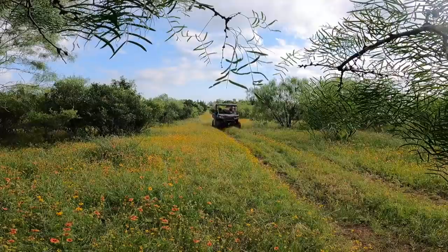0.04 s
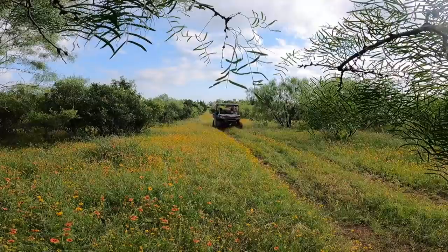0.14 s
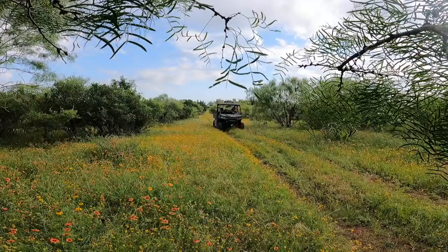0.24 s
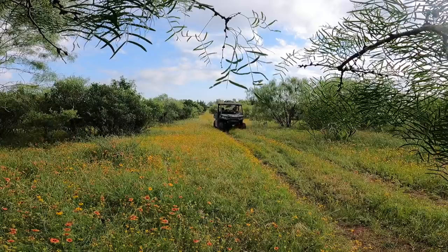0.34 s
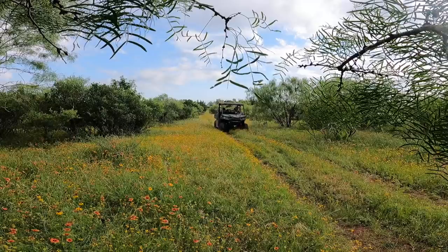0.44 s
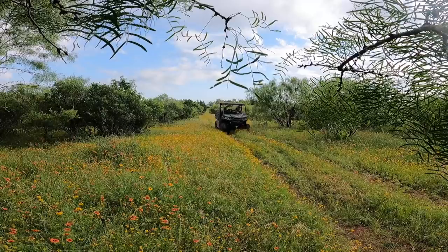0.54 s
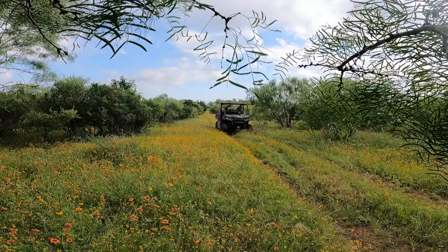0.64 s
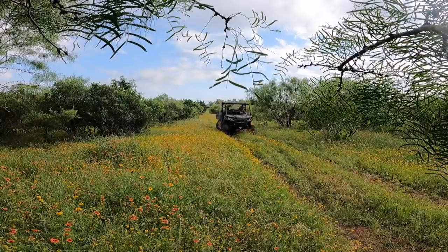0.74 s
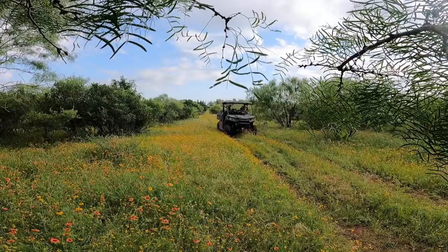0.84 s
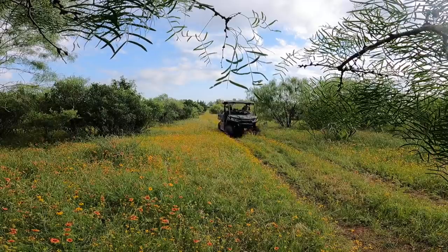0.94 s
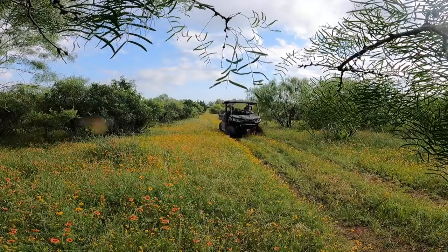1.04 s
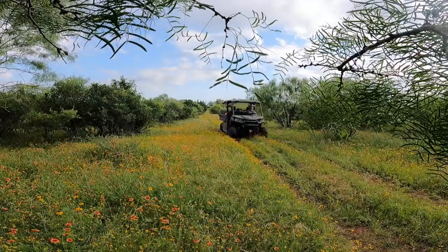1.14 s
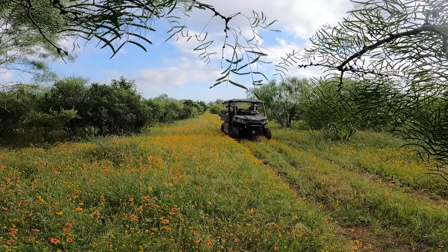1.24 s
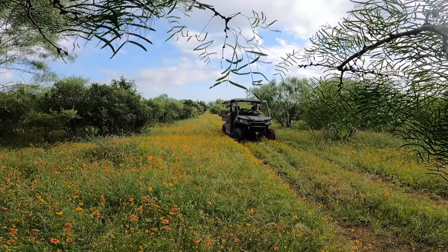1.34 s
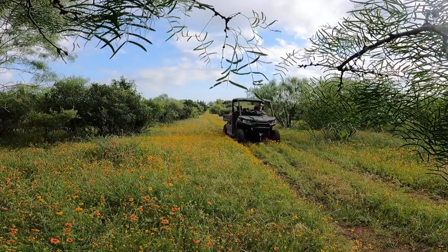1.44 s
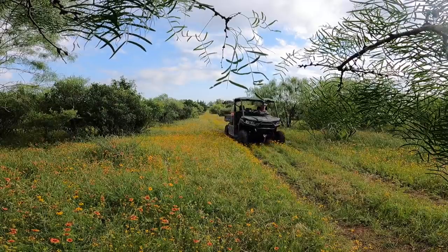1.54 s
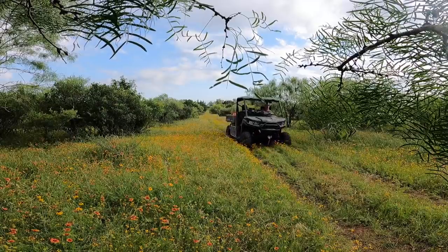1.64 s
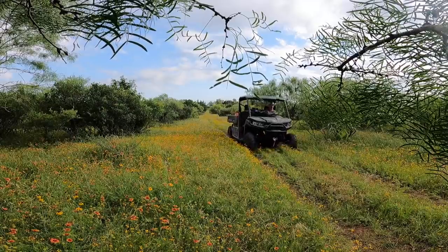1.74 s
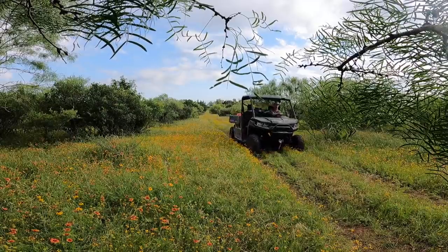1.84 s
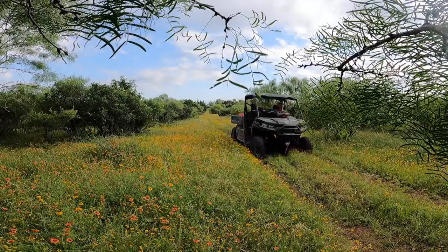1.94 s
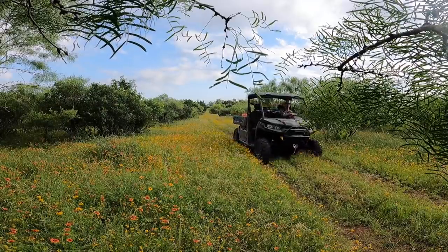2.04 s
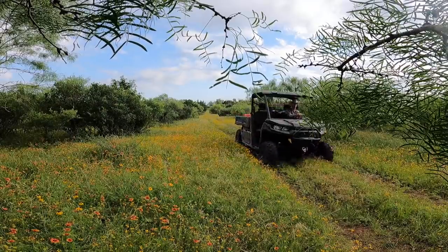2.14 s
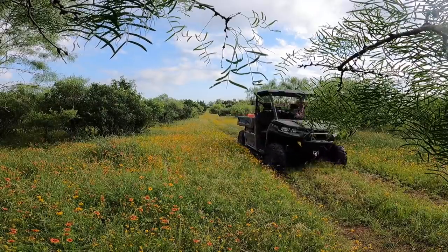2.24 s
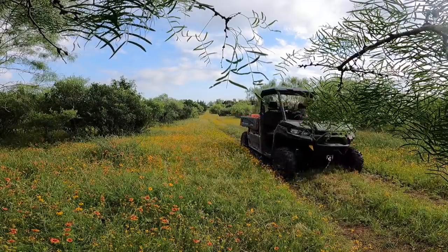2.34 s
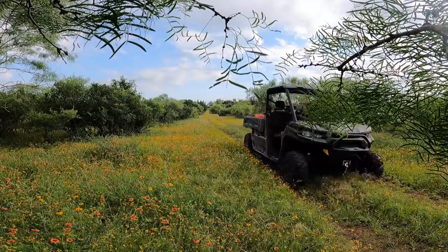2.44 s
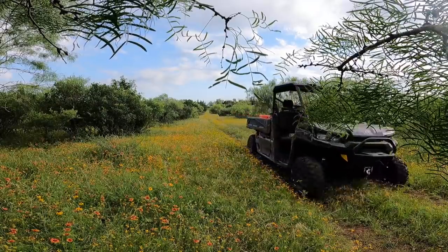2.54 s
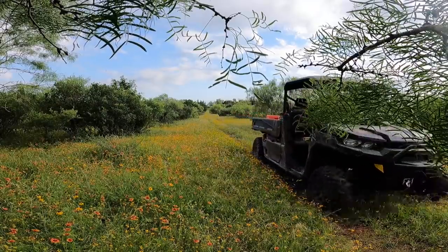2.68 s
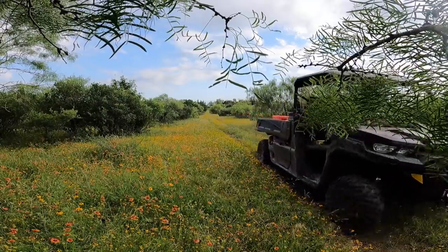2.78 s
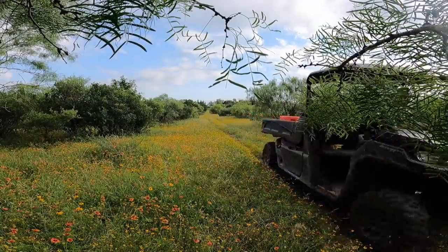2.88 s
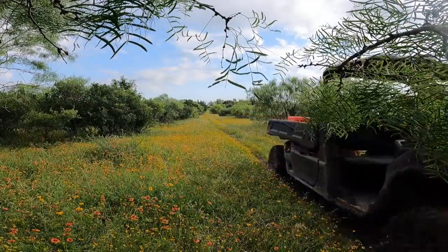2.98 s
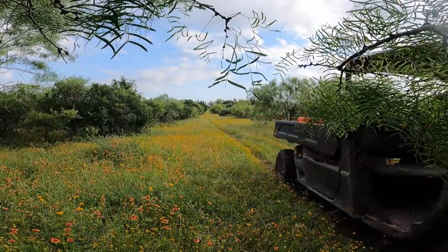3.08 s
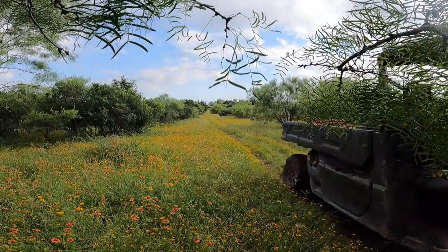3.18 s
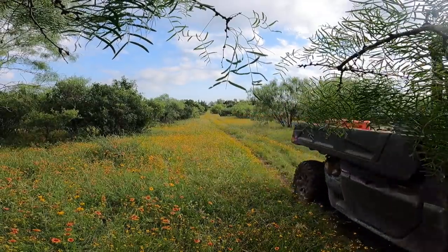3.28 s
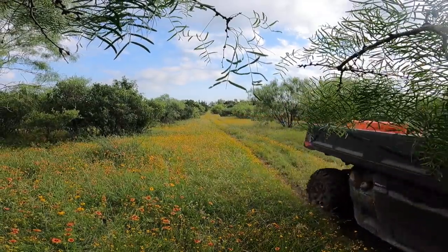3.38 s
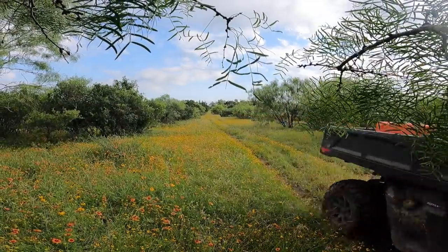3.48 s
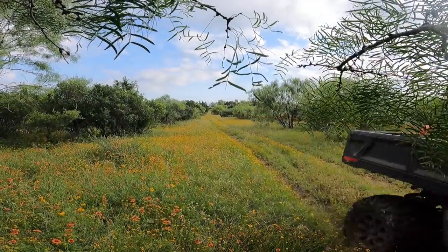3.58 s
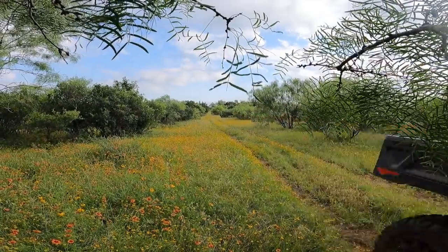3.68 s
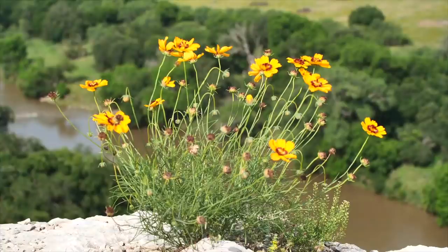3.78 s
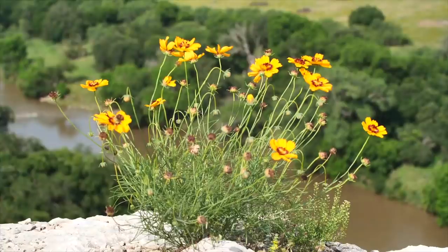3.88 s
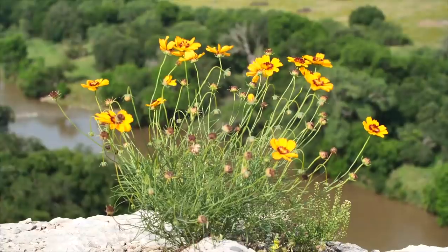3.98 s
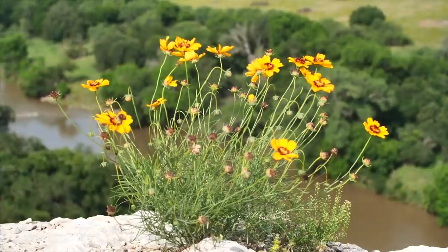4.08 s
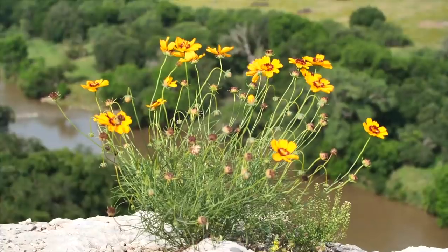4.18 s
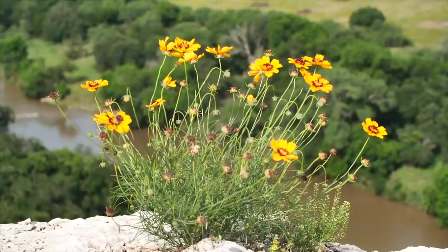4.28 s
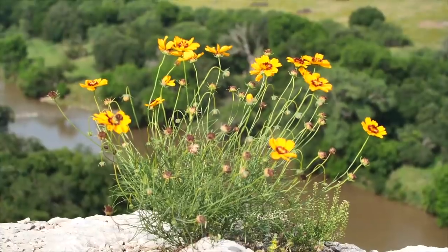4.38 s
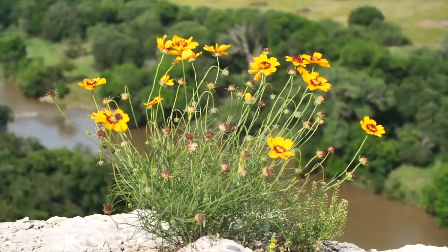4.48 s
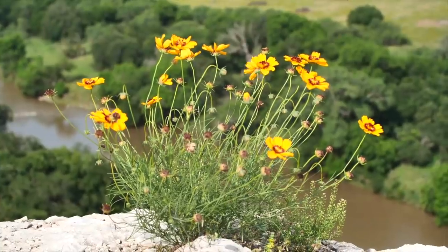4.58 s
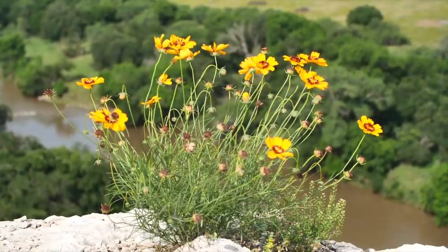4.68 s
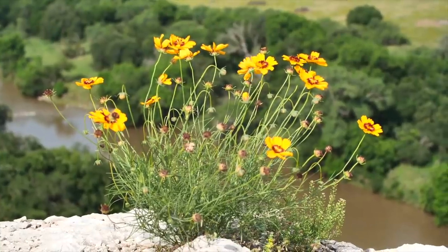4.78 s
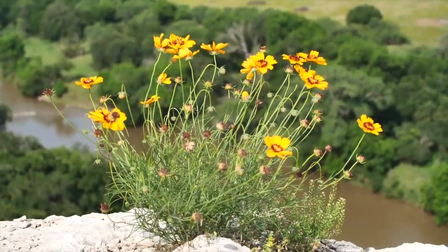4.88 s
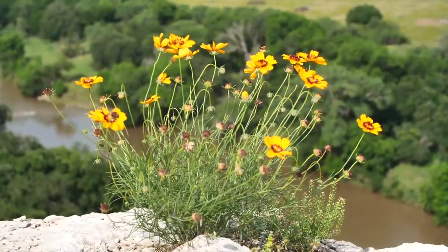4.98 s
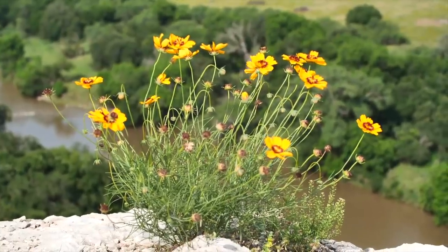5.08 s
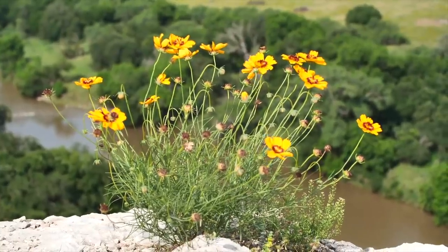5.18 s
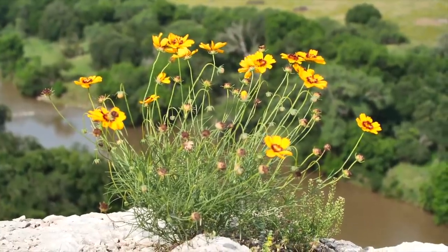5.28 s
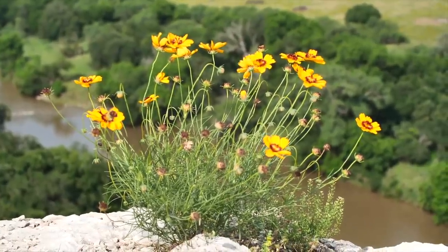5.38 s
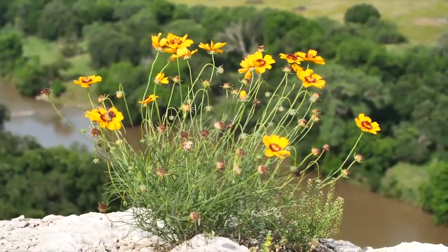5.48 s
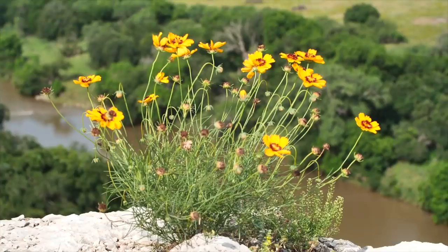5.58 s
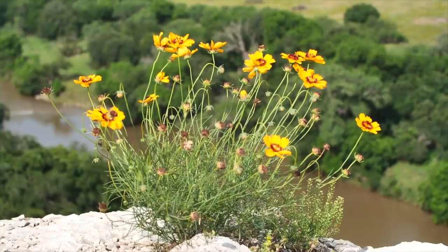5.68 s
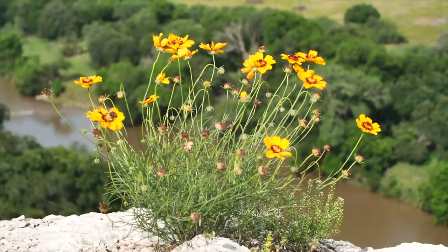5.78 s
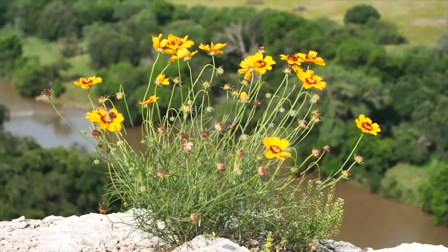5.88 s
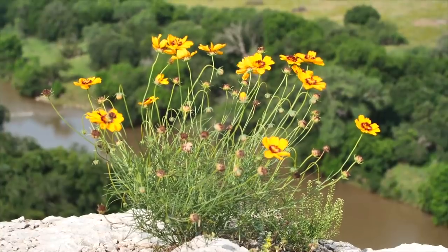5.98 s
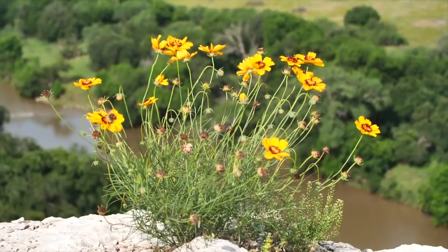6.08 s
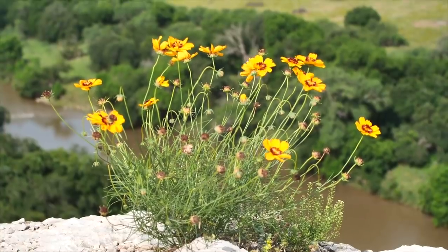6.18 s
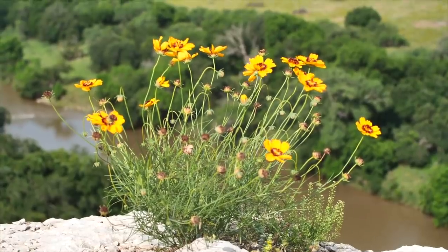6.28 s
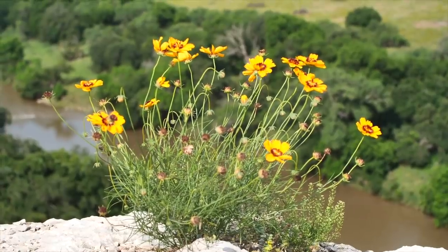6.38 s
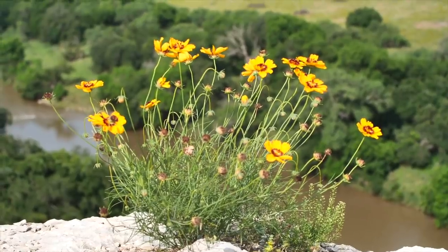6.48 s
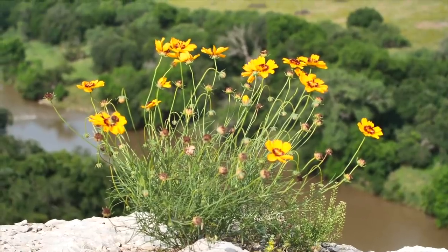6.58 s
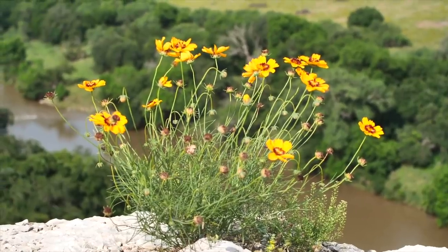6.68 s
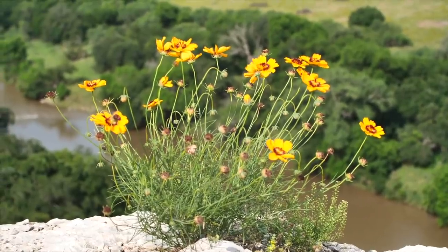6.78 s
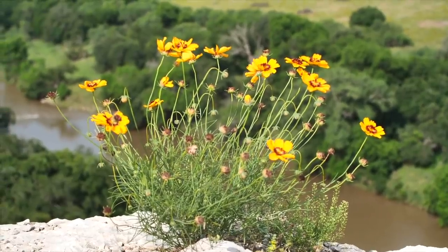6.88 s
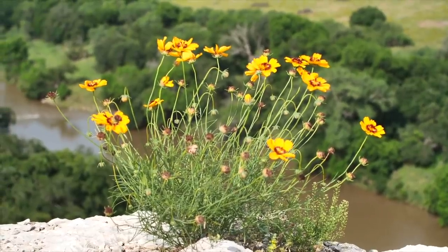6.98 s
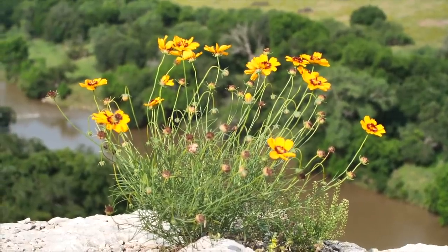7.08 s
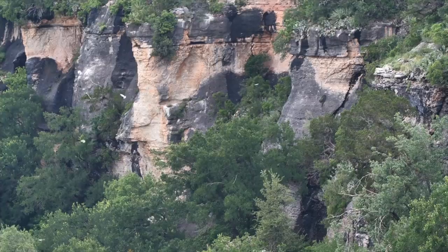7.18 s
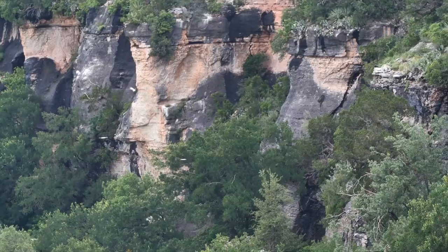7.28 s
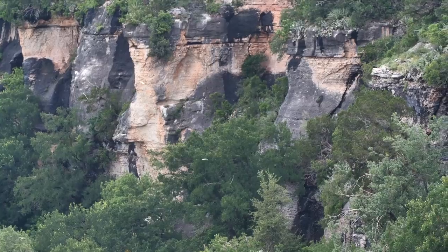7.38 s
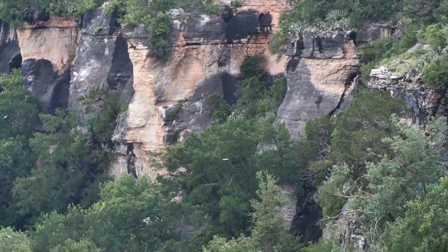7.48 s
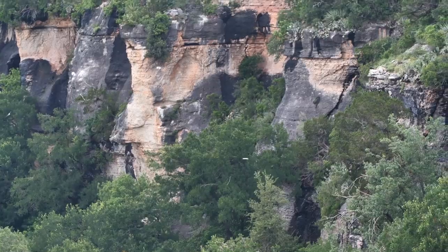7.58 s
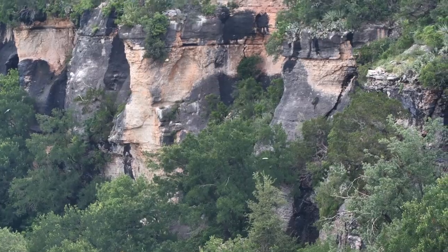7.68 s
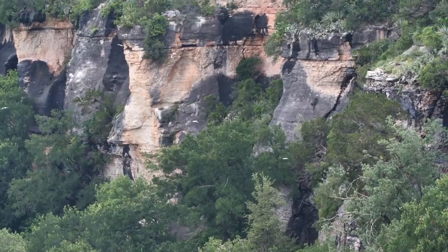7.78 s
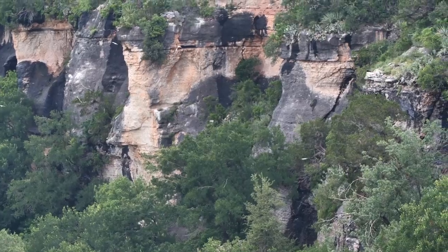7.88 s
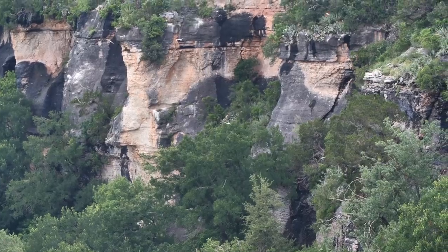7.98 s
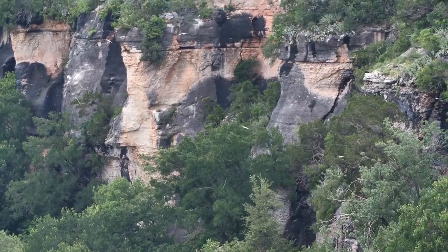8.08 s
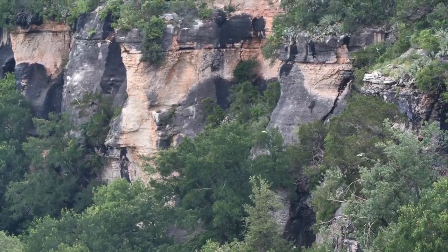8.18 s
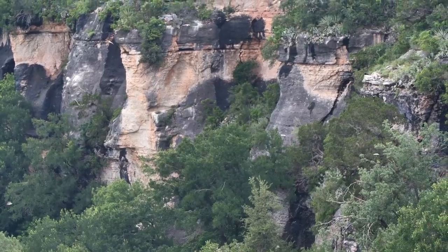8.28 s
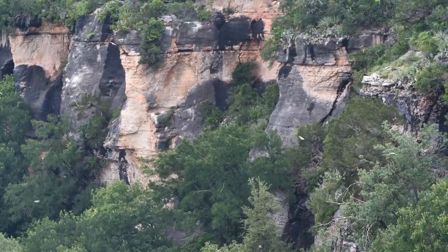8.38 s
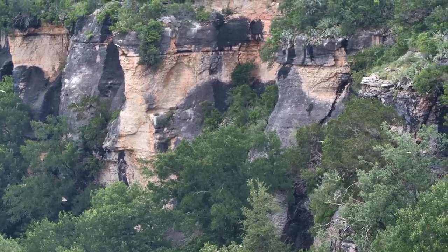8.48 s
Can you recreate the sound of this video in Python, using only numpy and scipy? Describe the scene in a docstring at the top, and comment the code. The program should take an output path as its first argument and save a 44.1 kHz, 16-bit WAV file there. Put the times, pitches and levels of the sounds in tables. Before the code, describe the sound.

A small twin-cylinder utility vehicle drones up a grassy track, passes close, drops to a putter and vanishes, leaving whistling songbirds and soft breeze.

```python
"""On a grassy track in open country, a twin-cylinder utility vehicle drives up, passes close by and fades at idle.
Engine cycles drive its exhaust tones, its tailpipe rings with uneven firings, and shaped noise gives
clatter, tyres and grass. One songbird whistles near by in gliding notes; others warble and twitter
farther off, scattered by leaves and echoed by trees and cliffs. As the vehicle leaves, a breeze of
coloured noise and a faint far hum of three tones rise."""
import sys
import numpy as np
from scipy import signal
from scipy.fft import rfft, irfft, next_fast_len
from scipy.io import wavfile
from scipy.ndimage import map_coordinates

SR = 44100
rng = np.random.default_rng(int(sys.argv[2]) if len(sys.argv) > 2 else 0)


def wrap_up_sound(samples):
    """Save the sound to the file named by the first command line argument, as 16-bit audio."""
    columns = np.atleast_2d(samples).T
    # keep every value between -1 and 1, then stretch to whole-number steps
    tamed = np.clip(columns, -1, 1)
    steps = np.round(tamed * 32767).astype(np.int16)
    wavfile.write(sys.argv[1], SR, steps)


N = 376173  # length in samples


def amp(db):
    """Decibels to gain."""
    return 10 ** (np.asarray(db) / 20)


def unit(x):
    """Scaled to rms 1."""
    return x / np.sqrt(np.mean(x ** 2) + 1e-20)


def along(points, hz):
    """Read (Hz, value) points on a log frequency axis."""
    f, v = np.transpose(points)
    return np.interp(np.log(hz + 1), np.log(f + 1), v)


def curves(rows):
    """One value per sample for each column after the time."""
    s, *cols = np.transpose(rows)
    return [np.interp(np.arange(N) / SR, s, c) for c in cols]


def wobble(rate):
    """A smooth random curve with rate knots a second."""
    knots = rng.standard_normal(int(N * rate / SR) + 4)
    return map_coordinates(knots, [np.arange(N) * rate / SR])


def filtered(x, response):
    """x times a response of frequency."""
    m = next_fast_len(N + SR // 2)
    return irfft(rfft(x, m) * response(np.fft.rfftfreq(m, 1 / SR)), m)[..., :N]


def ring(x, colour, size=16384):
    """Ring x through a causal, minimum-phase body with the given colour."""
    cepstrum = irfft(np.log(amp(along(colour, np.fft.rfftfreq(size, 1 / SR)))))
    # fold the cepstrum forward, so the body only answers after it is struck
    cepstrum[1:size // 2] *= 2
    cepstrum[size // 2:] = 0
    return signal.fftconvolve(x, irfft(np.exp(rfft(cepstrum))))[:N]


def add(track, s, sound):
    """Mix a sound into a track at time s."""
    part = track[max(round(s * SR), 0):][:len(sound)]
    part += sound[:len(part)]


def swells(rows):
    """Gain of a row of bell-shaped swells, each (s, half length s, dB)."""
    t = np.arange(N) / SR
    return sum(amp(db) * np.exp(-((t - s) / half) ** 2) for s, half, db in rows)


# Stereo spread of noise. Each row: frequency in Hz, side against mid in dB before each layer's offset.
WIDTH = [(150, -30.5), (380, -22), (700, -14), (1300, -7), (4400, -17), (15000, -20)]


def rush(spectrum, side_db):
    """Coloured stereo noise of rms 1, its width varying with frequency."""
    mid, side = filtered(rng.standard_normal((2, N)), lambda hz: amp(along(spectrum, hz)))
    side = filtered(side, lambda hz: amp(along(WIDTH, hz) + side_db))
    return unit(np.array([mid + side, mid - side]))


# Engine speed, a cruise dropping to idle. Each row: time in seconds, engine cycles a second.
ENGINE_SPEED = [(0, 25.88), (1.5, 26.02), (2.7, 26.14), (3.0, 26.0), (3.4, 25.55), (3.9, 24.75),
                (4.1, 24.5), (4.3, 22.7), (4.52, 21.35), (5.3, 20.3)]
# Clatter of the machinery. Each row: frequency in Hz, relative level in dB.
MACHINERY = [(290, -8.5), (500, -1.5), (661, -1), (843, -5.5), (969, -1), (1250, -5), (1370, -3.5),
             (1830, -10), (2130, -12), (2310, -11.5), (3430, -19), (4230, -17.5), (5090, -21),
             (7210, -27.5), (8000, -38), (10400, -40.5), (17600, -120)]
# Rumble of tyres and chassis. Each row: frequency in Hz, relative level in dB.
ROLL = [(25, -20), (60, 4), (110, 6.5), (200, -1.5), (350, -10), (600, -18), (1000, -56.5)]
# Brushed grass and dry stalks. Each row: frequency in Hz, relative level in dB.
GRASS = [(1500, -4), (3500, 4.5), (6000, -1.5), (8000, -4), (10000, -12.5), (12200, -14.5), (14000, -38),
         (15500, -51)]
CUT_S, CUT_DB_PER_S = 5.33, 402  # the last of the vehicle dies quickly


def vehicle():
    """Exhaust, clatter in step with the engine, a drive whine and tyres rolling through grass."""
    turns = .56 + np.cumsum(curves(ENGINE_SPEED)[0]) / SR
    exhaust = boom(turns) + bark(turns + 0.2398)  # the bark leads the boom, in cycles

    beat_db = 20 * np.log10(amp(.5 * np.cos(2 * np.pi * turns) + 0.29 * np.cos(4 * np.pi * turns)))
    clatter_db = beat_db + 0.81 * wobble(120) + 0.78 * wobble(12)
    clatter = passing("clatter") * unit(amp(clatter_db) * rush(MACHINERY, side_db=-17.0))

    # the rumble heaves with each firing and drops in the long gap
    chug_db = 2.5 * (np.cos(2 * np.pi * (turns - .21)) + np.cos(4 * np.pi * turns))
    rumble = passing("rumble") * unit(amp(chug_db + wobble(10)) * rush(ROLL, side_db=6.5))
    swish = passing("swish") * unit(amp(2.1 * wobble(500) + wobble(10)) * rush(GRASS, side_db=5.5))
    cut = amp(-CUT_DB_PER_S * np.maximum(np.arange(N) / SR - CUT_S, 0))
    return cut * (exhaust + clatter + whine(turns) + rumble + swish)


# How each part passes. Each entry: level abreast in dB before any fade, steepness of the distance law,
# start of its fade in seconds, fade in dB a second.
PARTS = { "boom": (-21.5, 0.73, 4.5, 31), "drone": (-25.2, 1.05, 2.65, 18), "clatter": (-36, 1.03, 4, 13.5),
         "whine": (-50, 2.2, 3.9, 18), "rumble": (-30.5, .5, 4.5, 18.5), "swish": (-47.5, 1.03, 4, 38)}
ABREAST_S, PASS_S = 3.526, 0.96  # the nearest moment; time to drive one passing distance


def passing(part):
    """Gain of one part of the vehicle: it swells with nearness and has its own later fade."""
    db, steepness, fade_s, fade_db_per_s = PARTS[part]
    t = np.arange(N) / SR
    distance = np.hypot(1, (t - ABREAST_S) / PASS_S)
    return amp(db - fade_db_per_s * np.maximum(t - fade_s, 0)) / distance ** steepness


# The exhaust's boom. Each row: engine order, relative level in dB from the front, from the side, from behind.
BOOM = [(1, -13, -6.5, -9.5), (2, 1.5, -2.5, 0.5), (3, 0.5, 2, -3.5), (4, -11, 1.5, -5)]
SIDE_S, TURN_S = 3.195, 0.82  # the side faces the listener; time from front to side, or side to rear


def boom(turns):
    """Low exhaust orders change with the side that faces us and stumble as the engine drops to idle."""
    unsteady, = curves([(0, .06), (4.1, .06), (4.4, .5), (5.3, .3)])  # radians
    out = np.zeros(N)
    for k, front_db, side_db, rear_db in BOOM:
        db, = curves([(SIDE_S - TURN_S, front_db), (SIDE_S, side_db), (SIDE_S + TURN_S, rear_db)])
        k = round(k)
        if k == 2:
            db = db + throb_db()
        # the second cylinder fires early in the cycle
        lag = np.angle(1 + .8 * np.exp(-2j * np.pi * k * .42))
        phase = 2 * np.pi * k * turns + lag + unsteady * wobble(22)
        out += np.sqrt(2) * amp(db + 1.1 * wobble(12)) * np.cos(phase)
    return passing("boom") * out


THROB_DB, THROB_HZ, THROB_SAG_HZ_PER_S = 4.5, 3.37, 0.72  # depth, rate at the first swell, slowing
THROB_PEAK_S, THROB_END_S = 0.15, 2.24  # its first swell, its end


def throb_db():
    """On the approach the firing tone beats, ever slower, and the beat dies as the vehicle comes near."""
    t = np.arange(N) / SR
    since = t - THROB_PEAK_S
    beats = THROB_HZ * since - .5 * THROB_SAG_HZ_PER_S * since ** 2
    return THROB_DB * np.clip(2 * (THROB_END_S - t), 0, 1) * np.cos(2 * np.pi * beats)


# The engine's drone from the front. Each row: frequency in Hz, relative level in dB.
DRONE = [(100, -25), (130, 9), (156, 0), (182, 2), (208, -5), (234, -2), (260, -11), (286, 2), (312, -8),
         (338, -12), (364, -5), (390, -2), (416, -12), (442, -24), (468, -2), (494, .5), (520, -14),
         (572, -9), (620, -14), (900, -35), (2000, -80)]
# The tailpipe's colour under load. Each row: frequency in Hz, relative level in dB.
LOAD_PIPE = [(85, -64.5), (108, -17), (124, 12), (150, 1.5), (178, -26), (205, 4), (240, 0), (276, 9),
             (310, 2), (345, -4.5), (415, -4.5), (480, -24.5), (600, -44), (900, -47), (2000, -79)]
# The tailpipe's colour at idle. Each row: frequency in Hz, relative level in dB.
IDLE_PIPE = [(70, -47.5), (90, -1), (103, 4), (122, -6.5), (160, -17), (210, -19), (245, -3.5), (285, -45),
             (400, -34), (470, -28), (900, -42), (2000, -82)]
# The tailpipe turns into view under load. Each row: time in seconds, level in dB.
LOAD_BARK = [(3.0, -57), (3.5, -36), (3.8, -25.5), (4.1, -26.5), (4.5, -41.5), (5, -67)]
# It putters at idle. Each row: time in seconds, level in dB.
IDLE_BARK = [(4.1, -58), (4.45, -36), (4.78, -30.5), (5.1, -37), (5.3, -46)]


def bark(turns, second_at=0.4243, second_db=-9, scatter_db=1.6):
    """Two uneven firings a cycle ring the tailpipe; from the front the engine drones and chugs."""
    firings = np.zeros(N)
    for offset, db in [(0, 0), (second_at, second_db)]:
        at = np.flatnonzero(np.diff(np.floor(turns - offset)))
        firings[at] += amp(db + scatter_db * rng.standard_normal(len(at)))

    waver, chug_db, cruise_hz = .16, -10, 26  # radians, dB against the tones, engine cycles a second
    steady = np.zeros(N)
    for k in range(5, 25):
        level = amp(along(DRONE, k * cruise_hz) + 1.5 * wobble(5))
        steady += level * np.cos(2 * np.pi * (k * turns + rng.random()) + waver * wobble(12))
    chug = amp(chug_db) * unit(ring(firings, DRONE))
    drone = passing("drone") * unit(unit(steady) + chug)
    loaded = amp(curves(LOAD_BARK)[0]) * unit(ring(firings, LOAD_PIPE))
    idling = amp(curves(IDLE_BARK)[0]) * unit(ring(firings, IDLE_PIPE))
    return drone + loaded + idling


# The drive's whine and its sidebands. Each row: engine order, relative level in dB.
WHINE = [(79, -5), (81, -5), (82, -6), (83, -1), (84, 0), (86, -8)]


def whine(turns):
    """The drive sings in a grainy band that comes and goes: close orders, each fluttering by itself."""
    flicker_db, waver, patchy_db = 3, 1.4, 3.6  # waver in radians
    tones = np.zeros(N)
    for k, db in WHINE:
        tones += amp(db + flicker_db * wobble(14)) * np.sin(2 * np.pi * k * turns + waver * wobble(40))
    return passing("whine") * unit(amp(patchy_db * np.tanh(2 * wobble(9))) * tones)


# The cargo bed rattles. Each row: start in seconds, relative level in dB.
RATTLES = [(1.284, -20.5), (1.436, -33), (1.715, -38), (1.788, -34), (1.864, -34), (1.895, -37),
           (3.619, -31), (4.231, -33)]
# Ringing modes of the steel bed. Each row: frequency in Hz, relative level in dB, t60 in seconds.
BED = [(2305, -1.5, 0.048), (2600, -1, 0.043), (3290, -10, 0.021), (3600, -4, 0.017)]
# The crack of each rattle. Each row: frequency in Hz, relative level in dB.
CLANK = [(900, -35), (1900, 2), (2600, -4), (3700, -3), (4300, -15.5), (7000, -39), (12000, -63)]
# Dry stalks break. Each row: start in seconds, relative level in dB.
SNAPS = [(0.387, -51), (0.6978, -46), (1.1573, -43), (1.705, -36), (2.8094, -39), (3.62, -35), (4.102, -41)]


def knocks(crack_t60=0.011):
    """Bumps ring the steel bed's modes with a noisy crack, and stalks snap under the wheels."""
    bed, clanks, stalks = np.zeros(N), np.zeros(N), np.zeros(N)
    t = np.arange(SR // 8) / SR
    clank_t60 = .028  # seconds
    for s, db in RATTLES:
        steel = np.zeros(len(t))
        for hz, level, t60 in BED:
            fading = amp(level + rng.normal(0, 2.1) - 60 * t / t60)
            steel += fading * np.sin(2 * np.pi * (hz * t + rng.random()))
        add(bed, s, amp(db - 4) * steel * (1 - np.exp(-t / 0.00038)))
        add(clanks, s, amp(db - 60 * t / clank_t60) * rng.standard_normal(len(t)))
    for s, db in SNAPS:
        add(stalks, s, amp(db + 6.5 - 60 * t / crack_t60) * rng.standard_normal(len(t)))
    return bed + ring(clanks, CLANK) + ring(stalks, GRASS)


# The tyres dig in. Each row: middle in seconds, half length in seconds, level in dB.
CRUNCHES = [(2.75, 0.12, -48), (3.27, .17, -41.5), (3.7, .14, -50)]
# Colour of crunching soil. Each row: frequency in Hz, relative level in dB.
GRIT = [(100, -50), (400, -34), (750, -1), (1020, 7), (1350, 2), (1700, -13), (2500, -17), (4500, -33),
        (12000, -55)]


def crunch():
    """Grains of soil give way in clumps under the passing tyres."""
    grains_per_s, clump_db = 700, 3
    grains = (rng.random(N) < grains_per_s / SR) * rng.standard_normal(N)
    grains = grains * amp(clump_db * wobble(30.17))
    return swells(CRUNCHES) * unit(ring(grains, GRIT))


# How far the vehicle's sound leans to the left, a little right at first and strongly left as it passes. Each
# row: time in seconds, lean (1 = the full shading below, negative leans right).
LEAN = [(0, -0.16), (2.5, -0.027), (3.2, 0.081), (3.6, 0.3), (3.95, 0.84), (4.4, 1.45), (5.2, 1.5)]
# Stereo shading at lean 1. Each row: frequency in Hz, left over right in dB.
LEAN_SHADE = [(150, 0.6), (280, 2.5), (470, 5), (1000, 13), (2300, 14), (4200, 8.5), (12000, 10)]


def travel(x):
    """The vehicle's sound leans ever more to the left as it passes, by an amount that depends on frequency."""
    hz, s, z = signal.stft(x, SR, nperseg=1024)
    ratio = amp(along(LEAN_SHADE, hz)[:, None] * np.interp(s, *np.transpose(LEAN)))
    left_right = 2 * np.array([ratio, np.ones_like(ratio)]) / (1 + ratio)
    return signal.istft(z * left_right, SR, nperseg=1024)[1][:, :N]


# The near bird's opening whistles and closing flourish. Each row: start in seconds, length in seconds,
# level in dB, middle pitch in Hz, shape.
SONG = [ (4.392, 0.038, -48, 4830, "rise"), (4.42, 0.021, -41.5, 4940, "scoop"),
        (4.44, 0.058, -59, 6100, "lead"), (4.5, 0.062, -36, 5274, "hold"),
        (4.612, 0.075, -48, 6300, "hump"), (4.678, 0.073, -32, 5344, "hold"),
        (5.48, 0.057, -40.5, 6550, "scoop"), (5.609, 0.067, -28.5, 4220, "scoop"),
        (5.748, 0.015, -40, 5700, "rise"), (5.76, 0.06, -42.5, 6920, "hump"),
        (5.808, 0.041, -28, 4350, "plunge"), (5.83, 0.045, -39.5, 3450, "fall"),
        (5.903, 0.07, -34.5, 4130, "crest")]
# Its phrase. Each row: seconds after the plunge, length in seconds, dB over the phrase, middle pitch in Hz, shape.
PHRASE = [(-.07, .2, -29.5, 7200, "hold"), (-.03, .048, -9.5, 5680, "lead"), (0, .045, 1, 4484, "plunge"),
          (0.034, .035, -18, 3120, "dip"), (0.066, .043, 1, 4567, "scoop")]
# Repeats of the phrase. Each row: time of the plunge in seconds, level in dB.
REPEATS = [(4.853, -30.5), (5.077, -29.5), (5.306, -29)]


def songbird():
    """The near bird opens with whistles, repeats its phrase and ends in a flourish."""
    phrases = []
    for s, db in REPEATS:
        for after, length, over_db, hz, shape in PHRASE:
            phrases.append((s + after, length, db + over_db, hz, shape))
    return sing(SONG + phrases)


# Note shapes by name. Each entry: pitch over the middle pitch, as a ratio, at five even steps.
SHAPES = { "hold": (1.0, 1.01, 1, 1.0, .97), "lead": (.92, .965, 1, 1.01, 1.0),
          "plunge": (1.33, 1.23, 1, .85, 0.75), "scoop": (0.82, .93, 1.005, 1.03, 1.01),
          "rise": (.81, .89, 1, 1.1, 1.18), "fall": (1.14, 1.07, 1, .93, 0.9),
          "dip": (1.3, 1.05, 1, 1.04, 1.066), "slide": (1.24, 1.1, 1, .97, .96),
          "climb": (.89, .94, 1, 1.06, 1.14), "droop": (1.1, 1.05, 1, .91, 0.82),
          "crest": (0.96, .89, 1, 1.14, 1.1), "hump": (.9, 0.97, 0.99, 0.94, 0.85),
          "vee": (1.27, 1.09, 1, 1.05, 1.25), "lift": (.91, .9, 1, 1.14, 1.27),
          "swoop": (1.42, 1.1, 1, 1.08, 1.07)}


def sing(notes):
    """A row of notes, each a shape sung at its own pitch."""
    out = np.zeros(N)
    for s, length, db, hz, shape in notes:
        add(out, s, amp(db) * whistle(length, hz * np.array(SHAPES[shape])))
    return out


def whistle(length, pitches):
    """One gliding note of a syrinx, swelling and fading, with a fine flutter and weak overtones."""
    flutter, shimmer_db, second_db, third_db = .006, .8, -39, -36  # flutter as a share of pitch
    u = np.linspace(0, 1, max(int(length * SR), 64))

    def quiver():
        return map_coordinates(rng.standard_normal(128), [u * length * 300], mode="mirror")

    hz = map_coordinates(np.array(pitches, float), [u * (len(pitches) - 1)], mode="nearest")
    phase = 2 * np.pi * np.cumsum(hz * (1 + flutter * quiver())) / SR
    swell = np.abs(np.sin(np.pi * u)) ** 0.91 * amp(shimmer_db * quiver())
    overtones = amp(second_db) * np.sin(2 * phase) + amp(third_db) * np.sin(3 * phase)
    return np.sqrt(2) * swell * (np.sin(phase) + overtones)


# The clearest calls of birds farther off. Each row: start in seconds, length in seconds,
# level in dB before the echoes, middle pitch in Hz, shape.
WARBLE = [ (.595, .1, -60, 4400, "hump"), (4.25, .09, -58, 5130, "hump"),
          (4.325, 0.063, -48, 3384, "slide"), (4.355, 0.038, -44, 3680, "fall"),
          (4.38, 0.11, -47, 3610, "climb"), (4.535, 0.084, -38.5, 3450, "hump"),
          (4.6, 0.093, -49, 2660, "dip"), (4.635, .04, -53, 4700, "fall"), (4.68, 0.063, -48, 2900, "lead"),
          (4.785, 0.033, -46, 4000, "dip"), (4.805, .04, -40, 3650, "rise"),
          (4.84, 0.077, -46.5, 2567, "vee"), (4.89, 0.05, -47, 3000, "climb"),
          (4.94, 0.042, -44, 3360, "rise"), (5.015, 0.081, -46, 3220, "rise"),
          (5.04, 0.039, -44, 3850, "rise"), (5.135, 0.04, -49, 3600, "rise"),
          (5.16, 0.043, -48, 3350, "fall"), (5.18, 0.08, -52.5, 2240, "fall"),
          (5.425, 0.12, -44.5, 2880, "slide"), (5.455, 0.051, -51, 3100, "fall"),
          (5.53, 0.046, -41.5, 3200, "droop"), (5.54, 0.15, -53.5, 2400, "dip"),
          (6.035, 0.046, -48, 3500, "droop"), (6.067, .04, -45.5, 2840, "vee"),
          (6.078, 0.033, -44, 3720, "hump"), (6.105, 0.041, -42, 4040, "hump"),
          (6.115, 0.058, -45, 3150, "lift"), (6.155, 0.02, -51, 5100, "fall"),
          (6.175, 0.095, -44, 3600, "fall"), (6.18, 0.085, -50, 2950, "slide"),
          (6.225, 0.082, -42.5, 3630, "fall"), (6.25, 0.16, -51, 2410, "dip"),
          (6.51, .05, -56, 4500, "rise"), (6.57, .07, -56, 3100, "hump"), (6.745, 0.061, -58, 4740, "fall"),
          (6.79, 0.06, -60, 4880, "climb"), (6.85, 0.1, -53.5, 3540, "dip"),
          (6.91, 0.073, -51, 3620, "lead"), (6.94, .04, -48, 3300, "rise"), (6.99, .1, -54, 3290, "slide"),
          (7.09, 0.054, -47.5, 2516, "droop"), (7.12, .07, -54, 3250, "vee"),
          (7.14, 0.09, -53.5, 2390, "climb"), (7.239, 0.021, -45, 3800, "plunge"),
          (7.25, .025, -53, 4500, "rise"), (7.3, .05, -59, 2000, "fall"), (7.36, .04, -55, 3500, "hump"),
          (7.365, .035, -55, 2550, "lead"), (7.38, 0.096, -59, 4800, "climb"),
          (7.48, .11, -55, 2370, "slide"), (7.525, .045, -57, 4940, "vee"),
          (7.53, 0.057, -56, 4050, "hump"), (7.55, 0.087, -55, 1810, "climb"),
          (7.635, 0.043, -50, 2850, "droop"), (7.66, .12, -48.5, 2400, "dip"),
          (7.648, 0.056, -46, 3390, "vee"), (7.705, 0.027, -45, 3500, "plunge"),
          (7.72, 0.027, -48, 4100, "rise"), (7.755, 0.035, -51, 4530, "fall"),
          (7.765, 0.064, -46, 3550, "rise"), (7.81, 0.049, -49, 2380, "lead"),
          (7.83, 0.04, -48, 2760, "dip"), (7.852, .022, -43, 3900, "fall"),
          (7.87, 0.071, -46, 2850, "fall"), (7.882, 0.028, -45, 3110, "vee"),
          (7.925, 0.058, -41, 2830, "swoop"), (7.952, 0.03, -52, 4920, "fall"),
          (7.962, .022, -45, 2740, "fall"), (7.992, 0.06, -39.5, 3210, "climb"),
          (8.0, 0.036, -56, 4650, "fall"), (8.085, .03, -53, 2500, "hump"), (8.11, .04, -51, 3200, "rise"),
          (8.155, 0.021, -54, 4900, "rise"), (8.177, 0.017, -50, 4400, "plunge"),
          (8.205, 0.02, -44, 4050, "plunge"), (8.225, .025, -49, 3800, "dip"),
          (8.27, 0.088, -50.5, 2695, "hump"), (8.385, .035, -55, 4450, "fall"),
          (8.385, 0.064, -48, 3400, "rise"), (8.445, 0.073, -50, 2680, "hump")]


def warblers():
    """Farther birds sing through leaves, and trees and cliffs answer them."""
    far = foliage(sing(WARBLE))
    return far + amp(-4) * echoes(far)


# Bouts of twittering in the trees. Each row: middle in seconds, half length in seconds, relative level in dB.
CHORUS = [(4.65, 0.21, -52), (4.953, 0.19, -48), (5.648, 0.087, -55), (6.165, 0.16, -49.5),
          (6.5, 0.071, -56), (7.0, 0.065, -55), (7.815, 0.14, -45), (8.21, 0.034, -53), (8.497, 0.1, -45)]
CHORUS_DB = -53  # the twittering between bouts, on the same relative scale


def chorus(count=340, centre_hz=3550, spread=.2):
    """Many distant birds twitter the same kinds of note at random, in bouts."""
    note_s = .045  # typical length
    out, shapes = np.zeros(N), list(SHAPES.values())
    starts = np.linspace(4.1, N / SR, count)
    chances = rng.standard_normal((count, 4))
    kinds = rng.integers(len(shapes), size=count)
    for s, z, kind in zip(starts, chances, kinds):
        pitches = centre_hz * np.exp(spread * np.clip(z[0], -2, 1.2)) * np.array(shapes[kind])
        level_db = 2.4 * z[1] - 1.4 * abs(z[0])  # voices carry best in the middle of their range
        add(out, s + .02 * z[2], amp(level_db) * whistle(note_s * np.exp(.3 * z[3]), pitches))
    return unit(out) * (amp(CHORUS_DB) + swells(CHORUS))


def foliage(x):
    """Leaves along the way scatter a far call into many close copies."""
    scatter_db, t60 = -9, .14  # t60 in seconds
    t = np.arange(SR // 8) / SR
    paths = rng.standard_normal(len(t)) * amp(-60 * t / t60)
    scattered = signal.fftconvolve(x, paths / np.linalg.norm(paths))[:N]
    return (x + amp(scatter_db) * scattered) / np.hypot(1, amp(scatter_db))


# Echoes among trees and cliffs. Each row: frequency in Hz, t60 in seconds.
TREES = [(300, 0.98), (3000, 0.74), (6000, 1), (12000, 0.69)]


def echoes(x):
    """The scattered answer of trees and cliffs: stereo noise dying at a rate set by frequency."""
    hz, t, z = signal.stft(rng.standard_normal((2, SR)), SR, nperseg=256)
    decay = amp(-60 * t / along(TREES, hz)[:, None])
    mid, side = signal.istft(z * decay, SR, nperseg=256)[1]
    tail = np.array([mid + .5 * side, mid - .5 * side]) / np.linalg.norm(mid)
    return signal.fftconvolve(x[None], tail, axes=1)[:, :N]


TICK_S, TICK_DB = 6.111, -33  # start, level before the grit's colour


def tick(t60=0.031):
    """A short gritty tick of dying noise."""
    out, t = np.zeros(N), np.arange(SR // 16) / SR
    add(out, TICK_S, amp(TICK_DB - 60 * t / t60) * rng.standard_normal(len(t)))
    return ring(out, GRIT)


# Colour of the breeze. Each row: frequency in Hz, relative level in dB.
BREEZE = [(35, -40), (60, -15), (95, -5.5), (140, 0.5), (230, -4.5), (350, -3.5), (440, 2.5), (640, -5),
          (850, -3), (1000, 0.5), (1300, 1), (1900, -5), (2400, -1.5), (4700, -6), (5700, -15.5),
          (8400, -18), (13500, -25), (15500, -33)]


def breeze():
    """Soft moving air: coloured noise with a gently wandering level."""
    return amp(-54.5 + 0.52 * wobble(3.17)) * rush(BREEZE, side_db=0.5)


# The far hum's tones. Each row: frequency in Hz, level in dB once the background has risen.
HUM = [(127, -72.5), (191, -75.5), (427, -75.5)]


def far_hum():
    """Steady low tones, each wavering in level and phase."""
    t = np.arange(N) / SR
    out = np.zeros(N)
    for hz, db in HUM:
        level = np.sqrt(2) * amp(db + 1.5 * wobble(2))
        out += level * np.sin(2 * np.pi * hz * t + 0.82 * wobble(6))
    return out


def country():
    """Near and far birds and a tick; breeze, hum and twitter rise as the vehicle leaves."""
    near, crowd = songbird(), foliage(chorus())
    birds = near + amp(-11.5) * echoes(near) + warblers()
    twitter = amp(-11.2) * (crowd + echoes(crowd))
    rise_db, = curves([(0, -90), (3.9, -9), (4.5, 4), (5.3, 0.5), (8.5, 0)])
    return birds + tick() + amp(rise_db) * (breeze() + far_hum() + twitter)


# Shading of sound from the left at leftward 1. Each row: frequency in Hz, left over right in dB.
LEFT_SHADE = [(200, 0), (400, 0), (700, 0.5), (1300, 2.5), (2400, 4), (4400, 2), (8000, 0.5)]


def pan(x, leftward):
    """Lean x to the left: the level difference grows with leftward and varies with frequency."""
    sides = np.array([[.5], [-.5]])
    return filtered(x, lambda hz: amp(leftward * along(LEFT_SHADE, hz) * sides))


def scene():
    """The vehicle over the open country."""
    balance = amp(np.array([[-.17], [.17]]))  # left and right, dB
    drive_by = travel(vehicle() + knocks() + crunch()) * balance
    return drive_by + pan(country(), leftward=1.4)


TOP_HZ = 15700


def record(dry):
    """Keep only what lies below the band limit."""
    return filtered(dry, lambda hz: hz < TOP_HZ)


dry = scene()
out = record(dry)
wrap_up_sound(out)
```